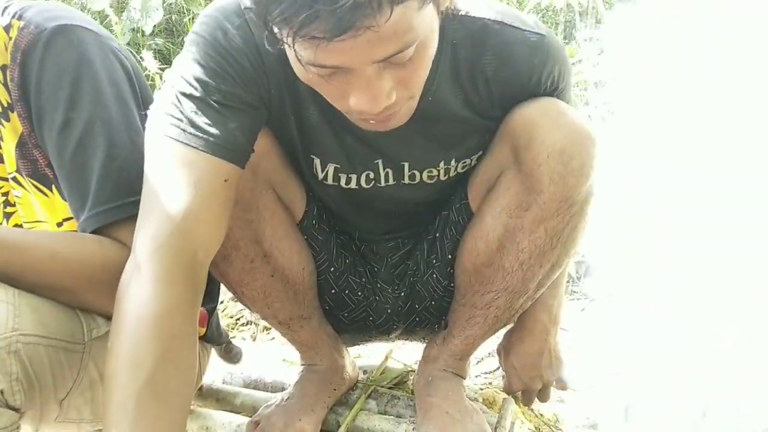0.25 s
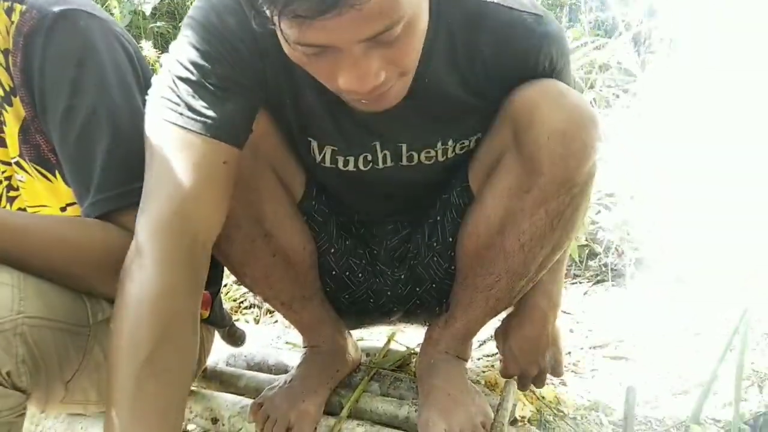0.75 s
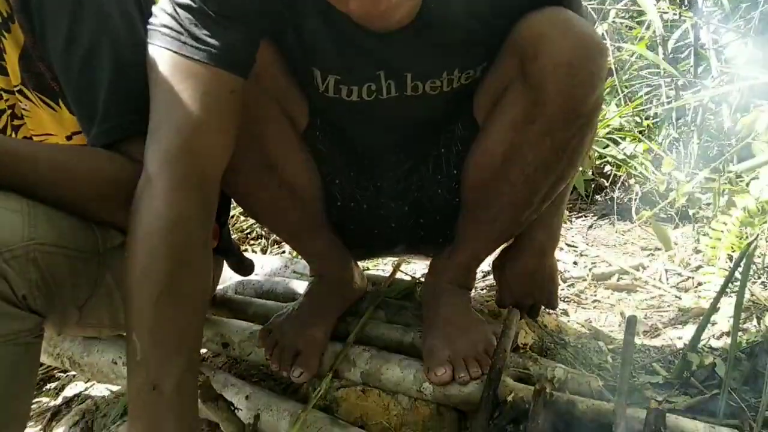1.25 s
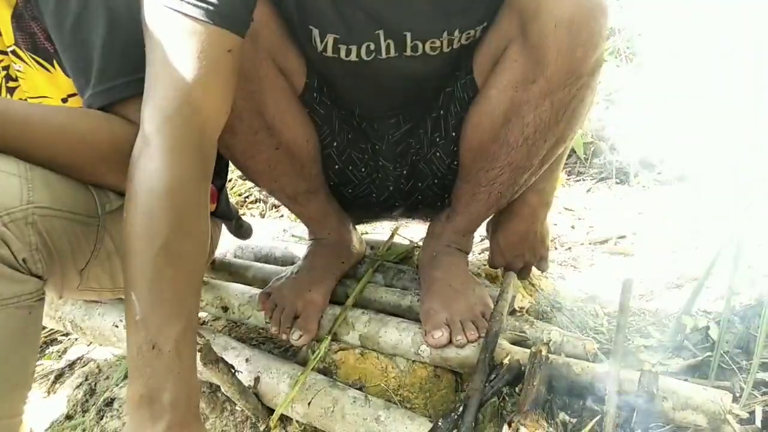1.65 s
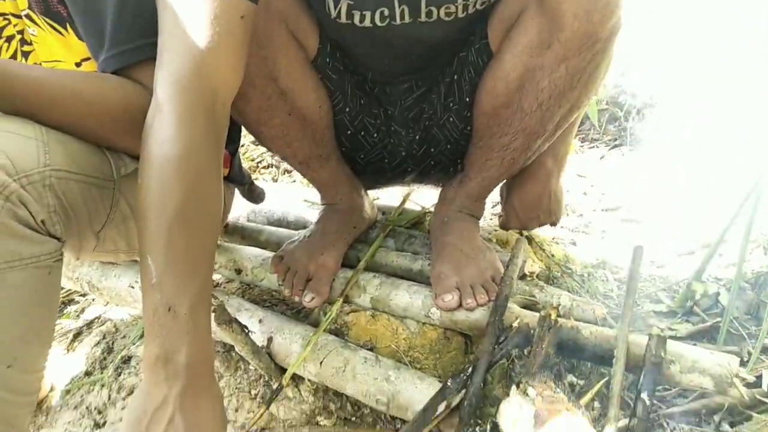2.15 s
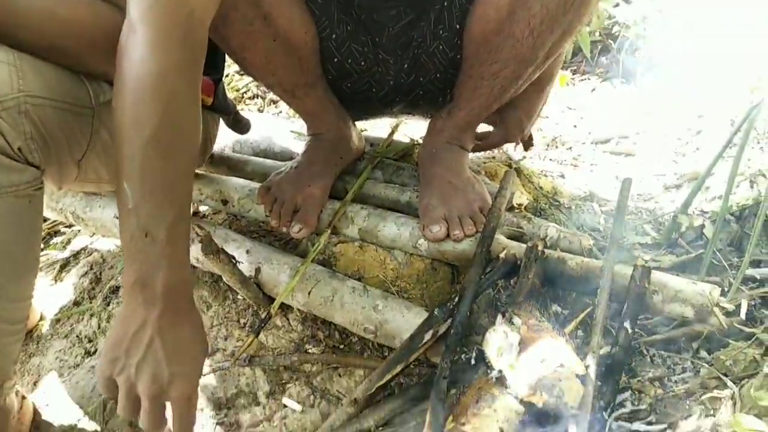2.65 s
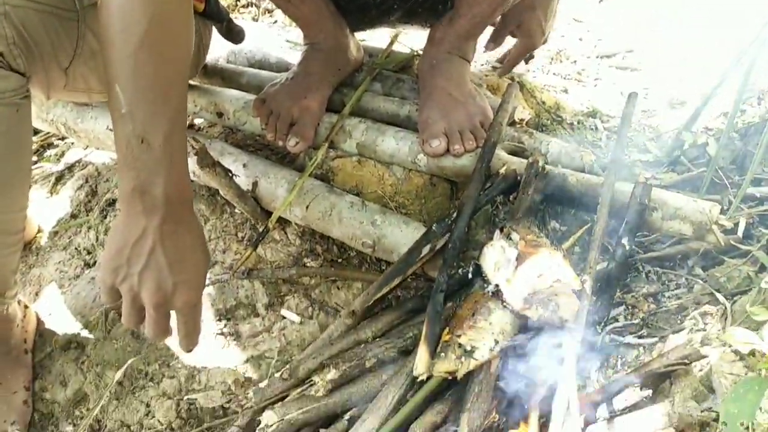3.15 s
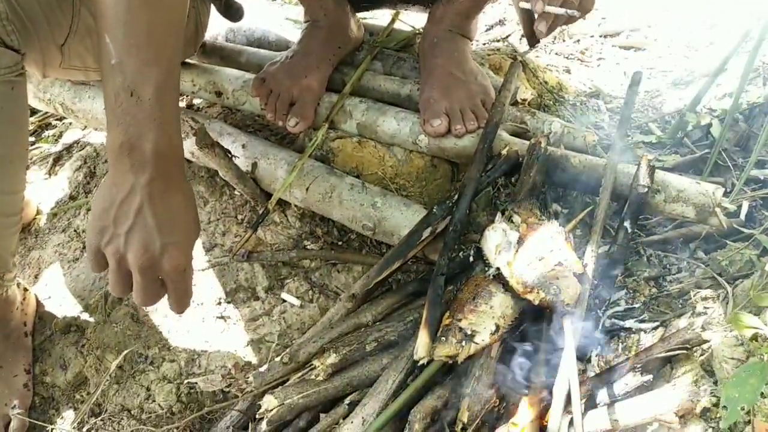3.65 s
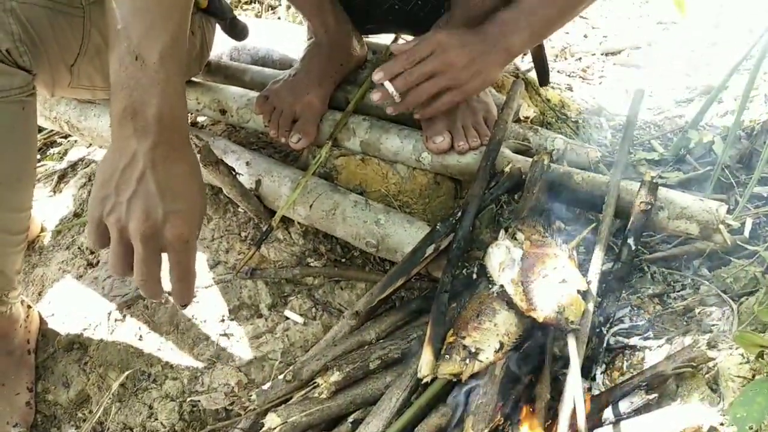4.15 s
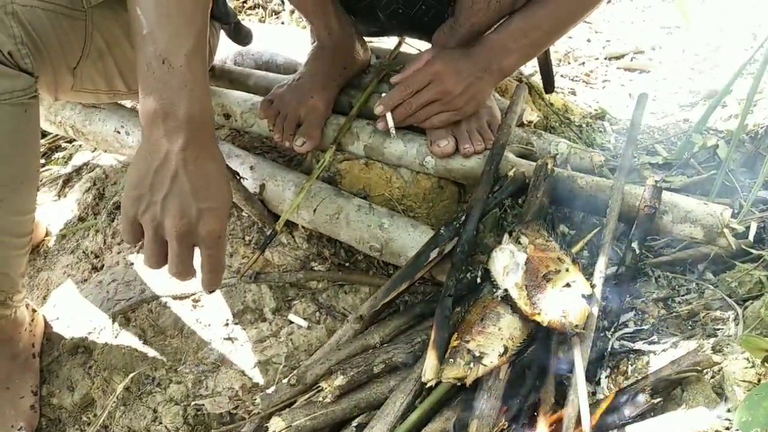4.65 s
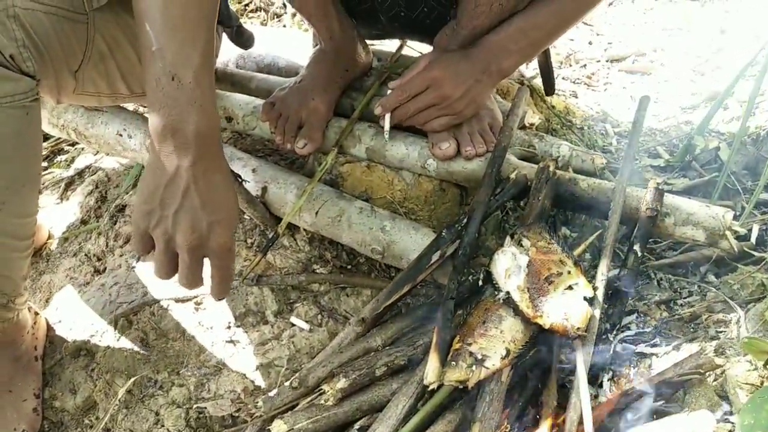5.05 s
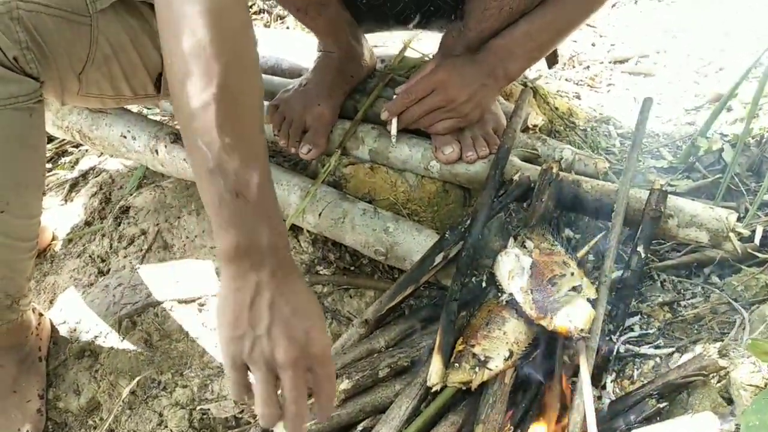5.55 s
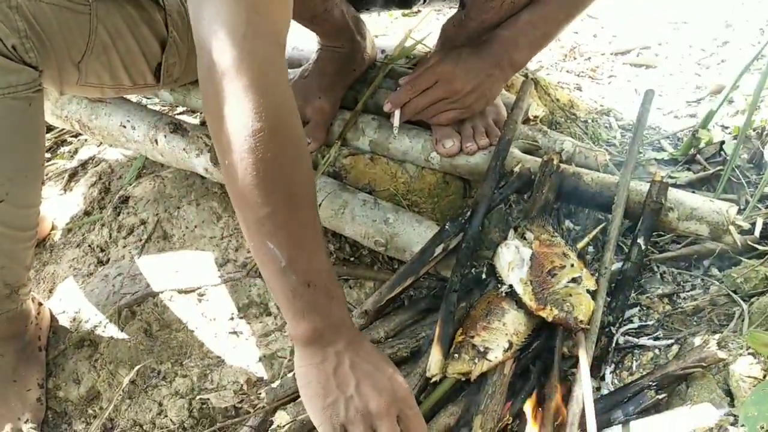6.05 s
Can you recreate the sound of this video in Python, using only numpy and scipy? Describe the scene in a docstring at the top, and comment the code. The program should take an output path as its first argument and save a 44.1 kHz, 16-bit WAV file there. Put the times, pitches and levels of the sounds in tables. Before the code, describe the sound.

A small stick fire ticks faintly and cracks sharply once late on, under a steady shrill insect drone with far birds whistling.

```python
"""Faint ticks and one sharp crack come from a small stick fire close by, on the ground in a forest clearing.
Insects drone high above a low outdoor rumble, a soft hum climbs, and far birds whistle among the trees.
The fire is short noise bursts through wood resonances; the birds are wavering near-sine notes blurred by echoes.
Insects, air and hum are shaped noise, and the dull bass bumps are short swelling sines."""
import sys
import numpy as np
from scipy import signal
from scipy.fft import rfft, irfft
from scipy.io import wavfile
from scipy.ndimage import uniform_filter1d

SR = 44100
rng = np.random.default_rng(int(sys.argv[2]) if len(sys.argv) > 2 else 0)


def inscribe(sig):
    """Save sig as 16-bit PCM at rate SR to the path in sys.argv[1].

    A 1-D sig is mono; a 2-D sig holds one channel per row.
    Samples are clipped to [-1, 1] before scaling.
    """
    pcm = np.round(np.clip(np.atleast_2d(sig).T, -1, 1) * 32767)
    wavfile.write(sys.argv[1], SR, pcm.astype(np.int16))


N = 277962  # length in samples

# The fire's clear pops. Each row: start in seconds, onset level in dB, centre in Hz, width in octaves.
TICK_EVENTS = [(0.119, -43.5, 6400, 1.3), (.445, -44, 4500, 1.3), (0.58, -48.5, 1860, 0.53),
               (0.615, -43.5, 1800, 0.77), (.658, -37.5, 5330, 0.52), (.666, -39, 5400, 0.55),
               (.869, -48, 6000, .8), (1.074, -46, 1910, 0.58), (1.319, -47.5, 535, 0.3),
               (1.366, -44, 430, 0.32), (1.577, -50.5, 1492, 1.3), (1.633, -47, 8000, .9),
               (1.778, -45, 1502, 1.4), (2.373, -44.5, 2810, 0.95), (2.657, -45, 560, 0.8),
               (2.964, -45.5, 3000, 1.05), (3.147, -48.5, 930, 0.45), (3.536, -38, 3000, 1.4),
               (3.542, -40, 4500, 3.8), (3.969, -41, 3200, 0.42), (3.971, -39, 7040, 0.12),
               (4.017, -44, 9000, 0.92), (4.337, -40.5, 5000, 2.1), (4.736, -45.5, 6270, 0.089),
               (4.76, -48, 1710, 0.42), (5.316, -49, 7900, 1.1), (6.123, -46, 6955, 1.23),
               (6.15, -35.5, 8750, 0.81)]
TICK_DECAY_S = 0.0034
# Pops that make a stick ring. Each row: start in seconds, peak level in dB, pitch in Hz, rise time in seconds.
KNOCK_EVENTS = [(.007, -45, 1780, 0.0015), (0.047, -44, 1310, 0.0023), (2.5005, -34, 2500, .002)]
KNOCK_SNAP_DB, KNOCK_SNAP_OCTAVES = -2.5, 0.33  # the snap that sets the ring off, relative to it
EMBER_FLOOR_DB, EMBER_RANGE_DB, EMBERS_PER_S = -59, 8.6, 24  # the tiniest ticks

# A stick splits in quick stages. Each row: start in seconds, onset level in dB, decay time in seconds.
CRACK_STAGES = [(5.6014, -14, 0.0013), (5.6036, -17, 0.0022)]
# The crack's tone colour. Each row: frequency in Hz, gain in dB before levelling.
CRACK_SPECTRUM = [(60, -21), (200, -8), (450, -18.5), (700, -16.5), (1050, -11), (1400, -11), (1700, 0),
                  (2000, -4), (2350, 0.5), (2900, -3.5), (4100, -13.5), (5500, -8), (7200, -1.5),
                  (9000, -10.5), (10200, -6), (12600, -20.5), (14500, -14)]
# Where the crack sits. Each row: frequency in Hz, left minus right in dB.
CRACK_BALANCE = [(300, 4), (1800, -3), (3000, 8), (5000, 3), (6700, 10), (9000, 1), (15000, 6)]
# How alike the crack is in both ears. Each row: frequency in Hz, likeness from -1 to 1.
CRACK_LIKENESS = [(300, 1), (800, 0.69), (1600, -0.61), (2500, 0.3), (5000, -0.26), (9000, 0.19)]
# The stick's recoil. Each row: start in seconds, level in dB before the swell, pitch in Hz, decay time in seconds.
RECOIL_THUDS = [(5.601, -33, 172, .0025), (5.601, -32, 350, .0014)]

# One bird's phrase, a thin high note and then an arched whistle.
# Each row: start in seconds, level in dB before distance. All bird levels are given before distance.
PHRASE_EVENTS = [(1.075, -64), (3.367, -61.5), (5.875, -66.5)]
LEAD_HZ, LEAD_S, LEAD_DB = 4930, 0.086, -5.5  # the thin note; its level is relative to the arch
ARCH_AFTER_S, ARCH_S, ARCH_FOOT_HZ, ARCH_TOP_HZ = 0.085, 0.15, 3470, 4550
PHRASE_WAVER = 0.022  # share of the pitch
# Long rasps that sag and fade.
# Each row: start in seconds, length in seconds, starting level in dB, waver as a share of the pitch.
RASP_EVENTS = [(0.019, 0.53, -54, 0.091), (1.878, 0.43, -54.5, .13)]
RASP_HZ, RASP_SAG_HZ_PER_S, RASP_FADE_DB_PER_S = 5890, 1200, 23
RASP_EDGE_S = 0.06  # soft swell at each end
# Lower slurred whistles. Each row: start in seconds, length in seconds, first pitch in Hz, last pitch in Hz,
# mid-note level in dB, waver as a share of the pitch.
SLUR_EVENTS = [(3.523, 0.028, 2384, 2258, -51, .025), (3.581, 0.072, 2350, 2310, -63, .03),
               (3.826, 0.026, 2367, 2210, -56, 0.027), (3.958, 0.052, 2403, 2333, -48.5, 0.034),
               (4.005, 0.04, 2420, 2876, -52, .035), (4.032, 0.053, 2880, 3390, -57, .05),
               (4.042, 0.072, 2425, 2322, -54.5, 0.032), (4.21, .11, 2953, 2915, -56.5, 0.023),
               (4.357, .07, 2994, 2980, -64, .03), (4.373, 0.063, 2257, 2165, -60, .03),
               (4.562, 0.027, 2860, 2590, -61, .035), (4.579, 0.035, 2295, 2705, -49.5, .018),
               (4.746, 0.034, 2400, 2255, -51, 0.03), (4.838, 0.038, 2450, 2970, -57.5, .03)]
SLUR_TAPER, SLUR_FADE_DB_PER_S = 0.14, 60  # taper: tapered share of the note
# A far bird's repeated chirps. Each row: start in seconds, level in dB.
CHIRP_EVENTS = [(.225, -65), (1.314, -66), (2.274, -60), (2.82, -64), (3.229, -58), (3.425, -60),
                (3.73, -58.5), (4.365, -60.5), (4.784, -60.5), (5.02, -61), (5.262, -61), (5.512, -59.5),
                (5.782, -61), (6.025, -59), (6.246, -59)]
# The contour of one chirp. Each row: seconds after the start, pitch in Hz, level in dB.
CHIRP_CONTOUR = [(0, 1991, -17.5), (.018, 2305, -0.5), (0.034, 2562, 3.5), (.06, 2582, -18)]
CHIRP_PITCH_SPREAD, CHIRP_WAVER = 0.019, 0.03  # shares of the pitch
CHIRP_LOW_SHARE, CHIRP_LOW_DB = 0.74, -9  # weaker second voice: share of the pitch, relative level
TRUNKS_T60_S, TRUNKS_DELAY_S = 0.2, 0.004  # nearby trunks blur each note

# The insects' two shrill bands. Each row: frequency in Hz, gain in dB before levelling.
INSECT_SPECTRUM = [(5500, -29.5), (6700, -16.5), (7200, -7), (7500, -2), (7720, -1), (8000, -6),
                   (8600, -19), (9300, -21), (9900, -14.5), (10600, -9.5), (11400, -16.5), (12200, -25),
                   (13000, -70)]
# Their loudness over time. Each row: time in seconds, level in dB.
INSECT_LOUDNESS = [(0, -49), (1.5, -49), (3.1, -49.5), (4.5, -49), (6.3, -49.5)]
# Their sideways drift, on top of the fixed balance. Each row: time in seconds, left minus right in dB.
INSECT_DRIFT = [(0, 1.5), (.8, 0.5), (1.9, -1), (4.5, -2.5), (6.3, -2.3)]

# The outdoor air. Each row: frequency in Hz, gain in dB before levelling.
AIR_SPECTRUM = [(20, -18), (40, -10), (70, 5), (110, 9.5), (200, 4.5), (350, -1.5), (520, -1.5), (800, -5),
                (1300, -6), (1900, -2.5), (2400, 0.5), (3500, -7.5), (5000, -12.5), (10000, -7),
                (13000, -23), (15000, -9)]
AIR_DB = -55  # before the flicker and the easing of the hiss
HISS_START_DB, HISS_EASE_DB_PER_S = 1.5, 0.77  # the hiss dies down slowly
RUMBLE_FLICKER_DB, HISS_FLICKER_DB = 2.35, 1.3

# A distant hum climbs steadily, then holds its pitch.
HUM_START_HZ, HUM_TOP_HZ, HUM_CLIMB_HZ_PER_S = 254.5, 392, 36
# Its loudness. Each row: time in seconds, level in dB before the trim.
HUM_LOUDNESS = [(0.0, -68), (0.64, -68), (3.46, -64.5), (5.1, -75), (5.4, -68), (6.3, -66.5)]
HUM_TRIM_DB = 2
# Soft low bumps. Each row: start in seconds, level of the swell in dB.
BUMP_EVENTS = [(0.492, -48.5), (1.97, -51), (3.3, -55.5)]

# Likeness of the two ears out in the open. Each row: frequency in Hz, likeness from -1 to 1.
OPEN_LIKENESS = [(30, 0.34), (70, 0.89), (130, 1), (380, 0.86), (700, 0.67), (1300, 0), (2400, 0),
                 (4400, 0), (15000, 0)]
# Likeness for sounds from the fire. Each row: frequency in Hz, likeness from -1 to 1.
NEAR_LIKENESS = [(100, 0.85), (700, 0.82), (2000, 0.67), (4000, 0), (9000, 0.13)]
# The general stereo balance. Each row: frequency in Hz, left minus right in dB.
BALANCE = [(100, 0), (480, 1.6), (950, 0.2), (1900, 2), (3800, 2), (5000, 2.5), (7500, 3), (10600, -0.2),
           (15000, 4)]
EDGE_HZ = 15600  # top of the recorder's band


def ticks():
    """Gas pops in the wood, ringing knocks and random ember ticks, with a short scattered tail."""
    pops, wood = np.zeros((2, N)), knocks()
    for s, db, hz, octaves in TICK_EVENTS:
        add(pops, s, amp(db) * tick(hz, octaves, TICK_DECAY_S))
    for when, size, pitch in rng.random((int(EMBERS_PER_S * N / SR), 3)):
        db = EMBER_FLOOR_DB + EMBER_RANGE_DB * size ** 2  # mostly small ones
        ember = tick(700 * 10 ** pitch, octaves=1.53, decay=0.0032)
        add(pops, when * N / SR, amp(db) * ember)
    to_scatter = scattered(amp(-6) * pops + amp(-12) * wood)
    return pops + wood + echoes(to_scatter, t60=0.07, delay=0.004)


def knocks():
    """Pops inside a stick: a small snap, while one note of the wood swells and dies."""
    out, t = np.zeros((2, N)), np.arange(2048) / SR
    for s, db, hz, rise in KNOCK_EVENTS:
        swell = (t / rise) ** 1.5 * np.exp(1.5 * (1 - t / rise))  # peaks at 1
        note = swell * np.sin(2 * np.pi * hz * t)
        add(out, s, amp(db) * note * np.ones((2, 1)))
        add(out, s, amp(db + KNOCK_SNAP_DB) * tick(hz, KNOCK_SNAP_OCTAVES, TICK_DECAY_S))
    return out


def tick(hz, octaves, decay):
    """A pocket of gas bursts and sounds one broad resonance of the wood."""
    puff = burst(decay)
    resonant = ring(puff, lambda f: -4.3 * (np.log2((f + 1) / hz) / octaves) ** 2)
    return unit(resonant) * puff.std()  # keeps the puff's loudness


def crack():
    """A stick splits and recoils; the wood pile scatters the sound, then the trees answer faintly."""
    out, t = np.zeros((2, N)), np.arange(2048) / SR
    for s, db, decay in CRACK_STAGES:
        add(out, s, amp(db) * snap(decay))
    out = ring(out, lambda f: read(CRACK_SPECTRUM, f))
    for s, db, hz, decay in RECOIL_THUDS:
        swell = np.exp(-t / decay) * t / decay
        add(out, s, amp(db) * swell * np.cos(2 * np.pi * hz * t) * np.ones((2, 1)))
    pile = amp(-7) * echoes(scattered(out, edge_hz=4000), t60=0.03, delay=0.0015)
    trees = amp(-15.5) * echoes(scattered(out, edge_hz=2600), t60=0.14, delay=0.008)
    return out + pile + trees


def snap(decay):
    """A burst of tearing fibres, its energy evened out over all pitches."""
    puff = burst(decay, CRACK_BALANCE, CRACK_LIKENESS)
    hz = np.fft.rfftfreq(puff.shape[1], 1 / SR)
    power = uniform_filter1d((abs(rfft(puff)) ** 2).sum(0), size=60)
    evened = ring(puff, lambda f: -10 * np.log10(np.interp(f, hz, power)))
    return unit(evened) * puff.std()


def burst(decay, pan=BALANCE, likeness=NEAR_LIKENESS, size=4096):
    """Fibres tearing: noise that starts at once and dies quickly, in uneven spurts."""
    spurts = amp(3 * unit(uniform_filter1d(rng.standard_normal(size), size=24)))
    fade = np.exp(-np.arange(size) / SR / decay)
    return unit(pair(size, pan, likeness) * fade * spurts) * np.sqrt(np.mean(fade ** 2))


def birds():
    """Birds heard mostly by way of the trees; the slurred whistles are nearest."""
    song, chirps, near = songs(), chirping(), slurs()
    direct = amp(-5) * song + amp(-3) * (chirps + near)
    trunks = amp(-1.0) * echoes(song + chirps + near, t60=TRUNKS_T60_S, delay=TRUNKS_DELAY_S)
    forest = amp(-3.0) * echoes(song + amp(1.5) * chirps + near, t60=1.0, delay=0.01)
    return (direct + trunks + forest) * amp([[1], [-1]])  # 2 dB stronger on the left


def slurs():
    """Short hoarse gliding whistles that start firmly and fade."""
    out = np.zeros((2, N))
    for s, length, first_hz, last_hz, db, waver in SLUR_EVENTS:
        t = np.arange(0, length, 1 / SR)
        note = whistle(np.linspace(first_hz, last_hz, len(t)), waver, SLUR_TAPER)
        add(out, s, amp(db - SLUR_FADE_DB_PER_S * (t - length / 2)) * note)
    return out


def songs():
    """One bird's repeated phrase and another's long rasps, as wavering pitch curves."""
    out = np.zeros((2, N))
    arch = 1 - abs(np.linspace(-1, 1, int(ARCH_S * SR))) ** 1.3
    arch_hz = ARCH_FOOT_HZ + (ARCH_TOP_HZ - ARCH_FOOT_HZ) * arch
    lead_hz = np.full(int(LEAD_S * SR), LEAD_HZ)
    for s, db in PHRASE_EVENTS:
        add(out, s, amp(db + LEAD_DB) * whistle(lead_hz, PHRASE_WAVER))
        add(out, s + ARCH_AFTER_S, amp(db) * whistle(arch_hz, PHRASE_WAVER))
    for s, length, db, waver in RASP_EVENTS:
        t = np.arange(0, length, 1 / SR)
        rasp = whistle(RASP_HZ - RASP_SAG_HZ_PER_S * t, waver, taper=2 * RASP_EDGE_S / length)
        add(out, s, amp(db - RASP_FADE_DB_PER_S * t) * rasp)
    return out


def chirping():
    """One hoarse, rising, two-voiced chirp, repeated at nearly the same pitch."""
    out = np.zeros((2, N))
    at, contour_hz, contour_db = np.transpose(CHIRP_CONTOUR)
    t = np.arange(0, at[-1], 1 / SR)
    hz = np.interp(t, at, contour_hz)
    swell_db = np.interp(t, at, contour_db)
    for s, db in CHIRP_EVENTS:
        pitch = hz * (1 + CHIRP_PITCH_SPREAD * rng.standard_normal())
        high = whistle(pitch, CHIRP_WAVER)
        low = amp(CHIRP_LOW_DB) * whistle(CHIRP_LOW_SHARE * pitch, CHIRP_WAVER)
        add(out, s, amp(db + swell_db) * (high + low))
    return out


def whistle(hz, waver, taper=0.16):
    """A near-sine note along a pitch curve; a quick random waver makes it raspy."""
    wobble = unit(uniform_filter1d(rng.standard_normal(len(hz)), size=40))
    tone = np.sin(2 * np.pi * np.cumsum(hz * (1 + waver * wobble)) / SR)
    return unit(tone * signal.windows.tukey(len(hz), taper)) * np.ones((2, 1))


def insects():
    """Many buzzing tymbals blur into two fluttering shrill bands, drifting to the middle as the microphone turns."""
    flutter = unit(uniform_filter1d(rng.standard_normal(N), 130))
    lean_db = np.array([[1], [-1]]) * curve(INSECT_DRIFT) / 2
    drone = shaped(pair(N), INSECT_SPECTRUM)
    return drone * amp(curve(INSECT_LOUDNESS) + 0.6 * flutter + lean_db)


def air():
    """Low outdoor rumble and the soft hiss of fire and leaves, which eases slowly."""
    wash = amp(AIR_DB) * shaped(pair(N), AIR_SPECTRUM)
    rumble = signal.sosfilt(signal.butter(1, 600, fs=SR, output="sos"), wash)
    hiss = wash - rumble
    flicker = unit(uniform_filter1d(rng.standard_normal(N), 1500))
    hiss_db = HISS_START_DB - HISS_EASE_DB_PER_S * np.arange(N) / SR
    return rumble * amp(RUMBLE_FLICKER_DB * flicker) + hiss * amp(hiss_db + HISS_FLICKER_DB * flicker)


def hum(width_hz=45):
    """A narrow band of noise that follows a climbing pitch: slow noise turned on a carrier."""
    sway = signal.sosfilt(signal.butter(2, width_hz, fs=SR, output="sos"), rng.standard_normal((2, N)))
    hz = np.minimum(HUM_START_HZ + HUM_CLIMB_HZ_PER_S * np.arange(N) / SR, HUM_TOP_HZ)
    turn = 2 * np.pi * np.cumsum(hz) / SR
    band = unit(sway[0] * np.cos(turn) + sway[1] * np.sin(turn))
    return band * amp(HUM_TRIM_DB + curve(HUM_LOUDNESS))


def bumps(hz=110, rise=0.01):
    """Dull, short swells of bass: a low sine that rises quickly and dies away."""
    out, t = np.zeros((2, N)), np.arange(SR // 5) / SR
    swell = t / rise * np.exp(1 - t / rise)
    for s, db in BUMP_EVENTS:
        add(out, s, amp(db) * swell * np.sin(2 * np.pi * hz * t) * np.ones((2, 1)))
    return out


def scattered(x, edge_hz=1300):
    """The treble that twigs and leaves throw back; the bass passes them by."""
    return signal.sosfilt(signal.butter(2, edge_hz, "high", fs=SR, output="sos"), x)


def echoes(x, t60, delay):
    """Diffuse reflections of unit energy, a decaying noise tail different in each ear."""
    t = np.arange(SR) / SR
    tail = rng.standard_normal((2, SR)) * amp(-60 * t / t60) * (t > delay)
    return signal.oaconvolve(x, unit(tail) / np.sqrt(SR), axes=1)[:, :N]


def ring(x, colour, size=2048):
    """Passes x through a causal minimum-phase filter of unit energy; colour maps Hz to dB."""
    gain_db = np.maximum(colour(abs(np.fft.fftfreq(size, 1 / SR))), -70)
    log_gain = np.log(amp(gain_db))
    # the Hilbert transform of the log gain gives the minimum phase
    taps = np.fft.ifft(np.exp(np.conj(signal.hilbert(log_gain)))).real[:size // 2]
    return signal.oaconvolve(x, taps[None] / np.linalg.norm(taps), axes=1)[:, :x.shape[1]]


def pair(size, pan=BALANCE, likeness=OPEN_LIKENESS):
    """White noise at two microphone ports, with a balance and a likeness that depend on frequency."""
    hz = np.fft.rfftfreq(size, 1 / SR)
    a, b = rfft(rng.standard_normal((2, size)))
    same = np.clip(read(likeness, hz), -1, 1)
    lean = amp(read(pan, hz) / 2)
    left = a * lean
    right = (same * a + np.sqrt(1 - same ** 2) * b) / lean
    return irfft(np.array([left, right]), size)


def shaped(x, points):
    """Gives a steady sound a spectrum, at rms 1."""
    return unit(irfft(rfft(x) * amp(read(points, np.fft.rfftfreq(N, 1 / SR))), N))


def amp(db):
    """Decibels to gain."""
    return 10 ** (np.asarray(db) / 20)


def unit(x):
    """Scales to rms 1."""
    return x / np.sqrt(np.mean(x ** 2) + 1e-20)


def read(points, hz):
    """Reads a spectrum table on a log-frequency axis."""
    f, value = np.transpose(points)
    return np.interp(np.log(hz + 1), np.log(f + 1), value)


def curve(rows, axis=1):
    """One column of a time table, for every sample."""
    rows = np.asarray(rows)
    return np.interp(np.arange(N) / SR, rows[:, 0], rows[:, axis])


def add(mix, s, sound):
    """Mixes a stereo sound in at time s, in seconds."""
    part = mix[:, max(round(s * SR), 0):][:, :sound.shape[1]]
    part += sound[:, :part.shape[1]]


def scene():
    """The fire in front, the forest all round."""
    return ticks() + crack() + birds() + insects() + air() + hum() + bumps()


def record(dry):
    """The recorder's band limit: a steep low-pass."""
    lowpass = signal.firwin(401, EDGE_HZ, window=("kaiser", 8), fs=SR)
    return signal.oaconvolve(dry, lowpass[None], "same")


dry = scene()
out = record(dry)
inscribe(out)
```